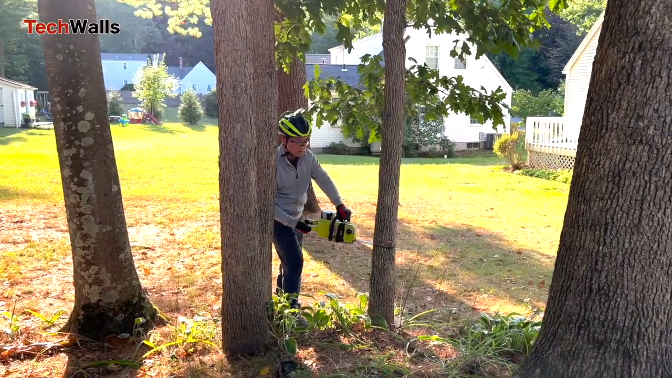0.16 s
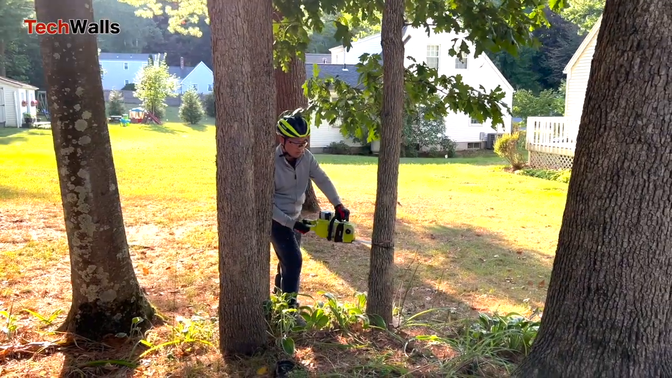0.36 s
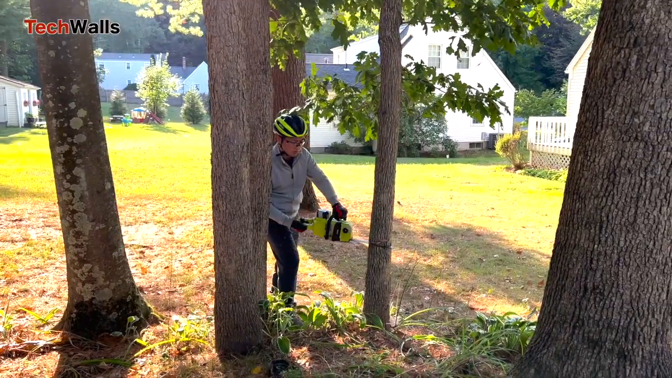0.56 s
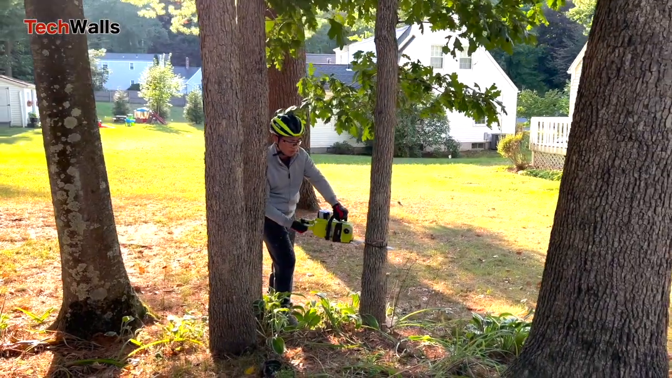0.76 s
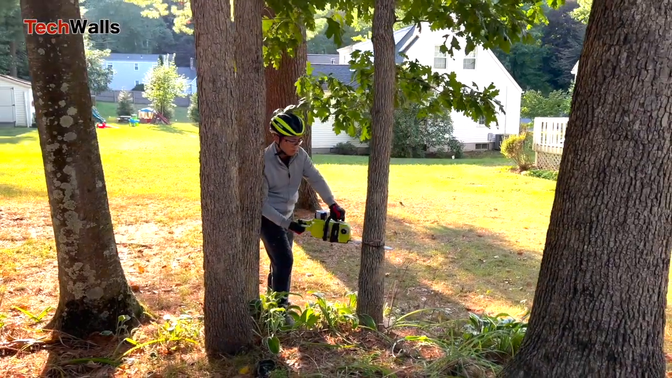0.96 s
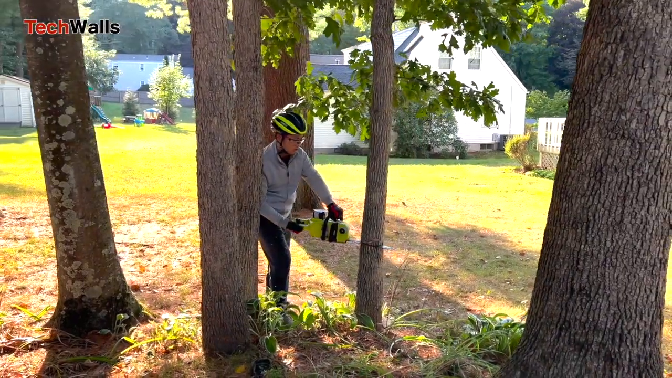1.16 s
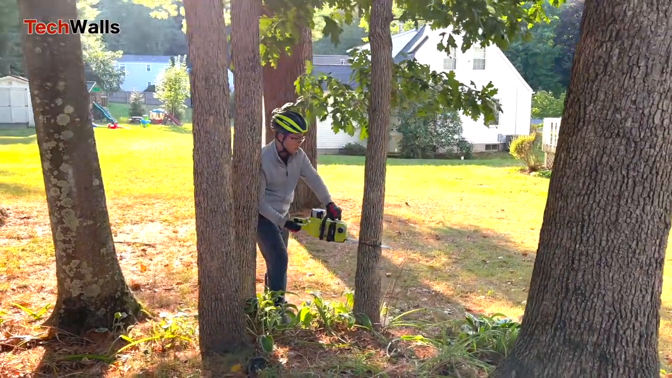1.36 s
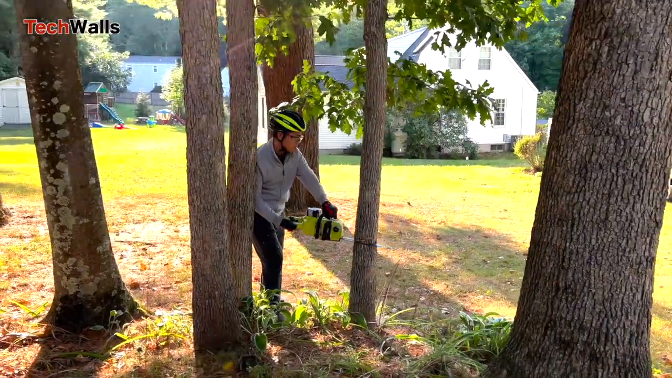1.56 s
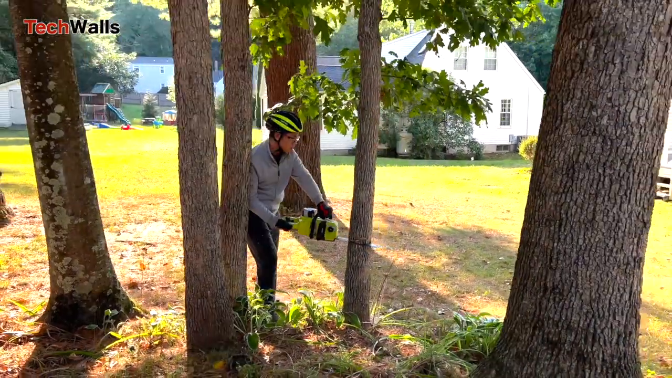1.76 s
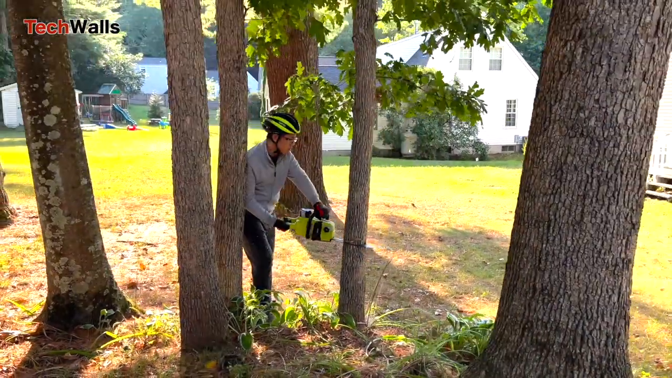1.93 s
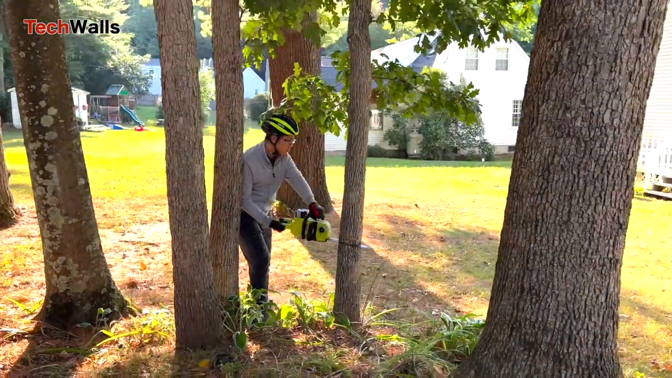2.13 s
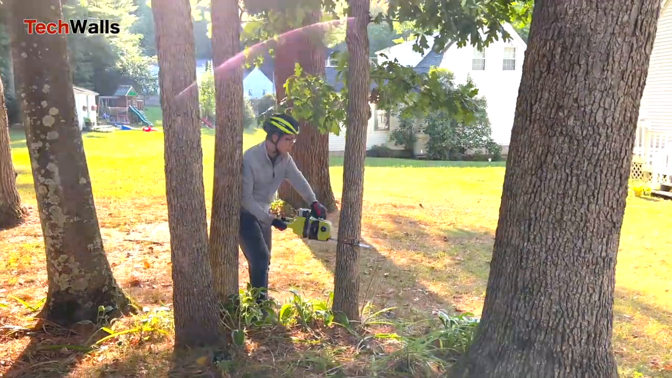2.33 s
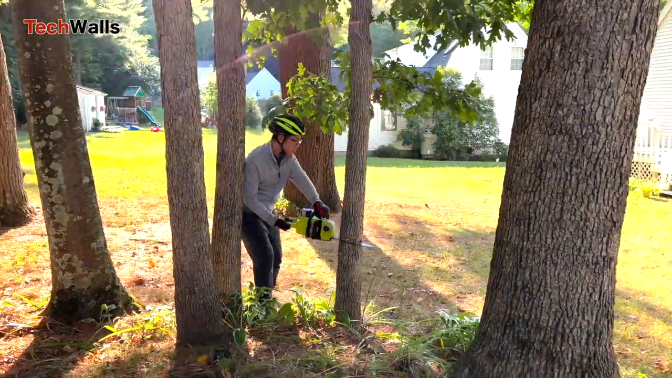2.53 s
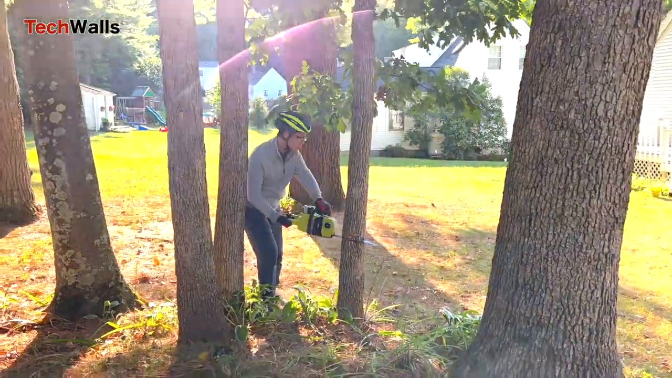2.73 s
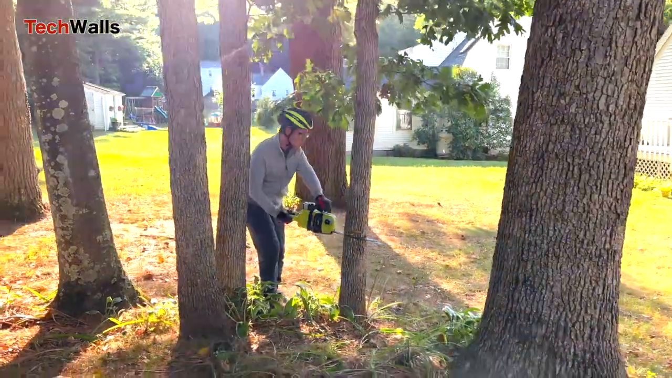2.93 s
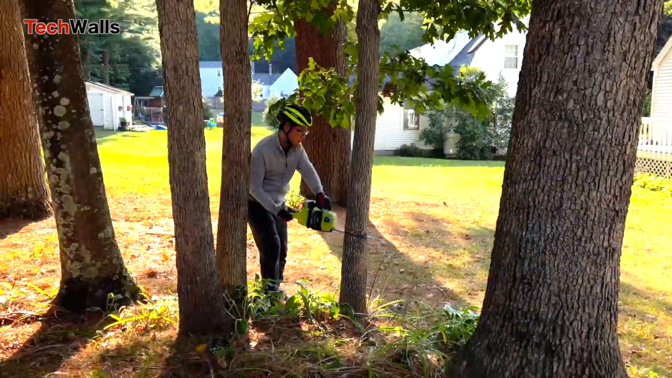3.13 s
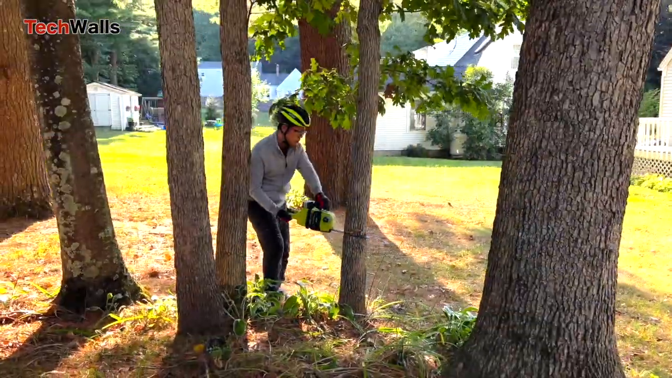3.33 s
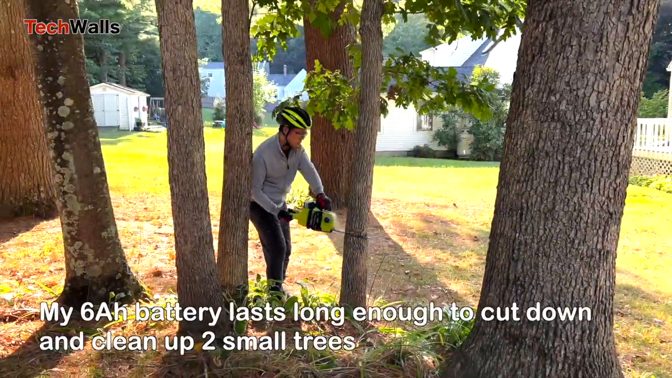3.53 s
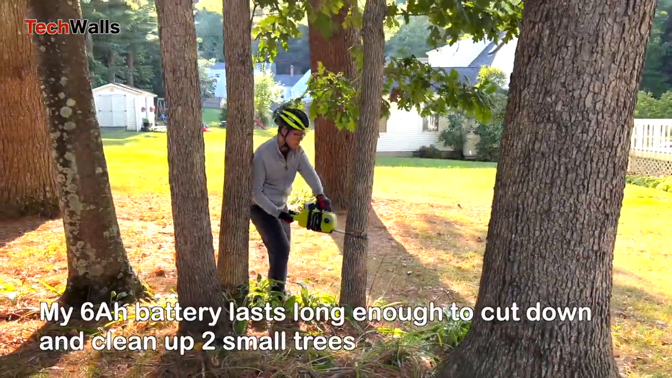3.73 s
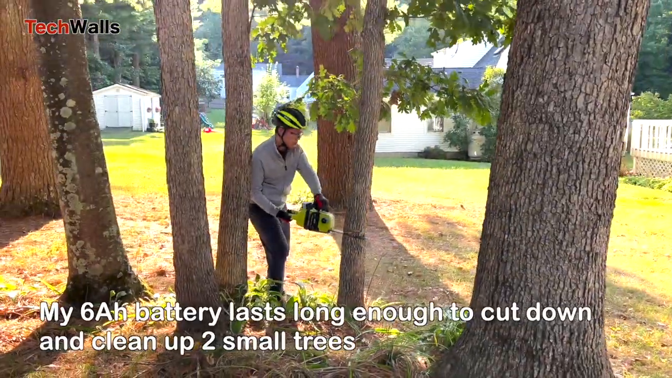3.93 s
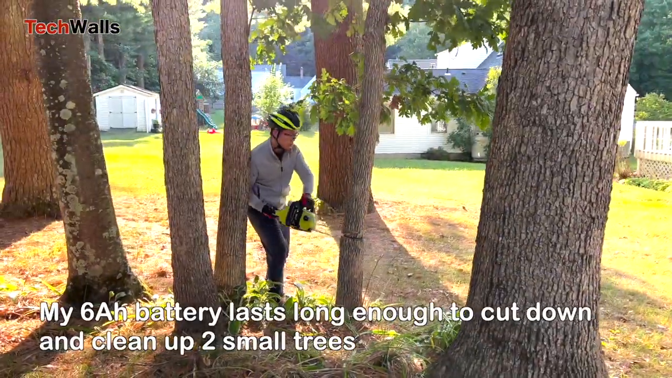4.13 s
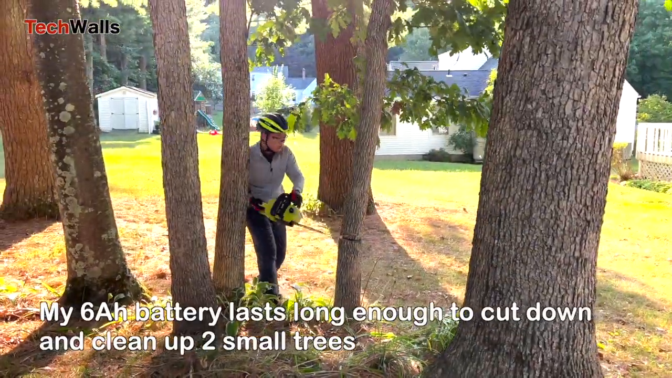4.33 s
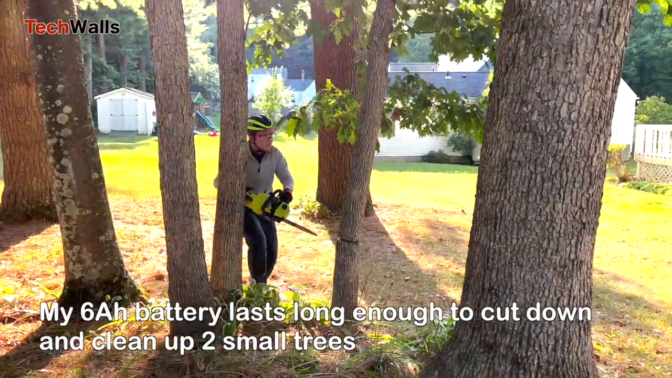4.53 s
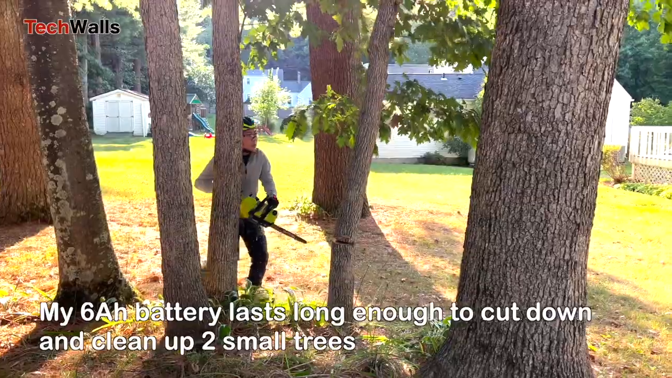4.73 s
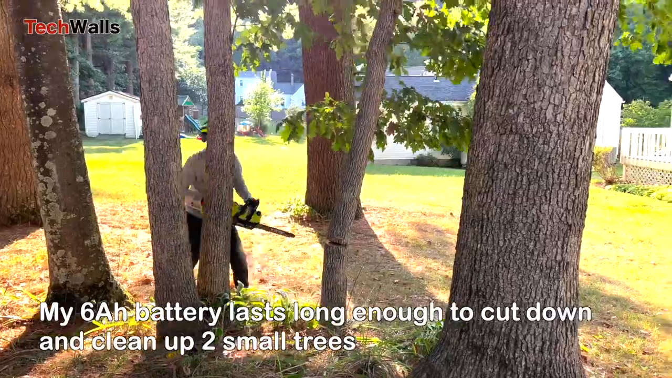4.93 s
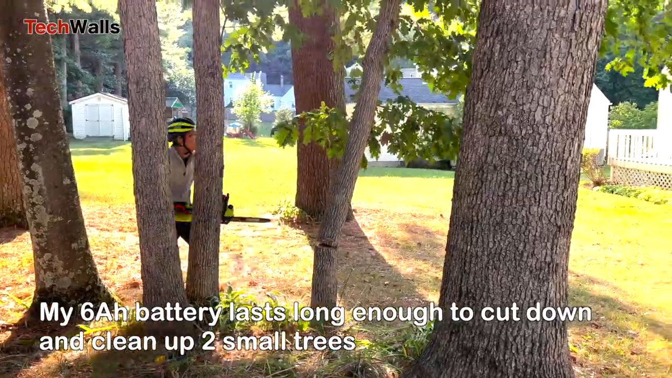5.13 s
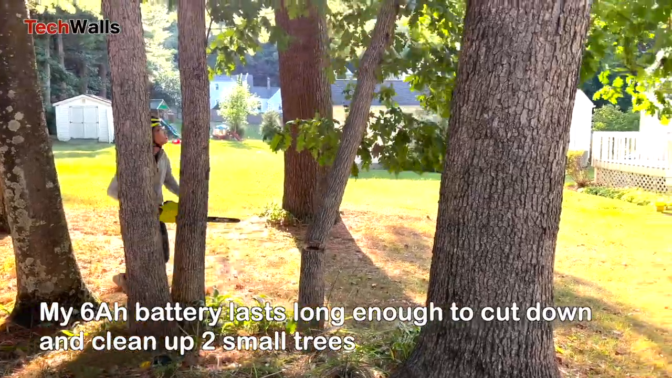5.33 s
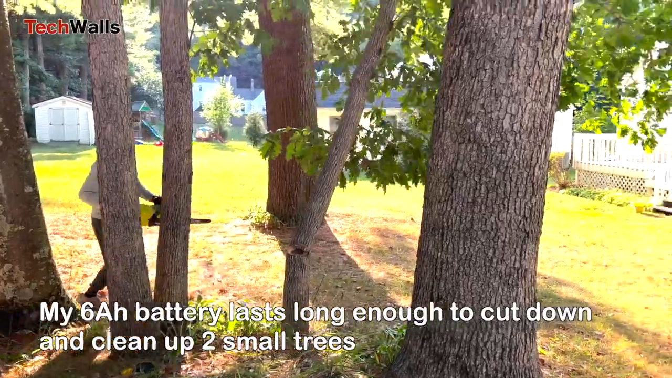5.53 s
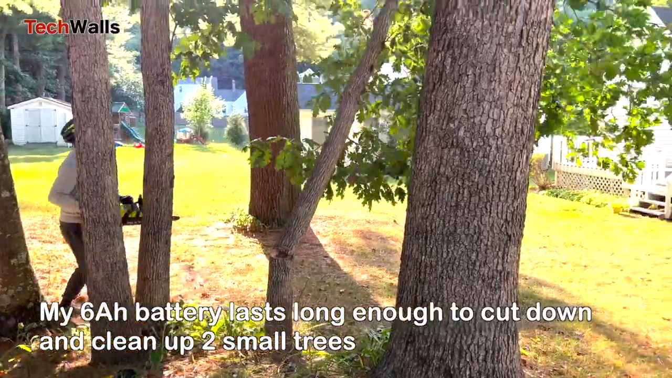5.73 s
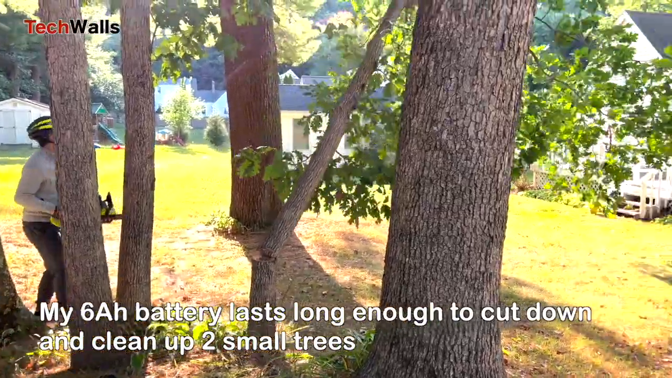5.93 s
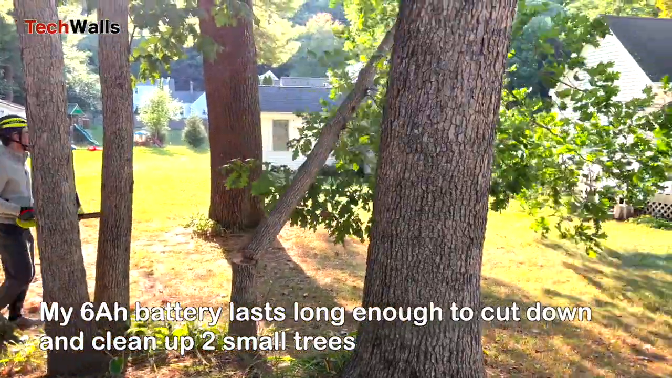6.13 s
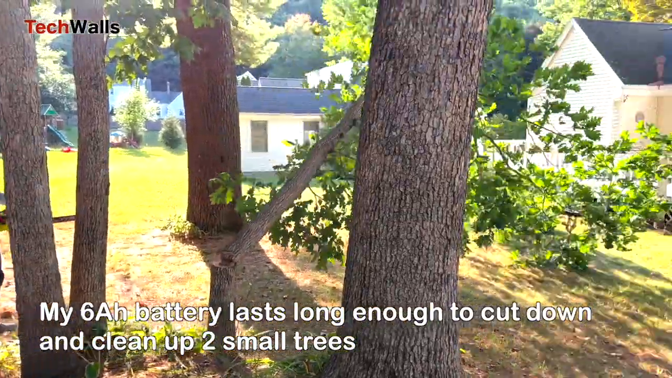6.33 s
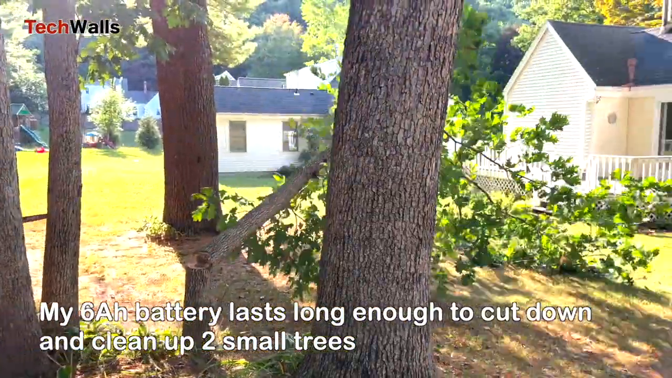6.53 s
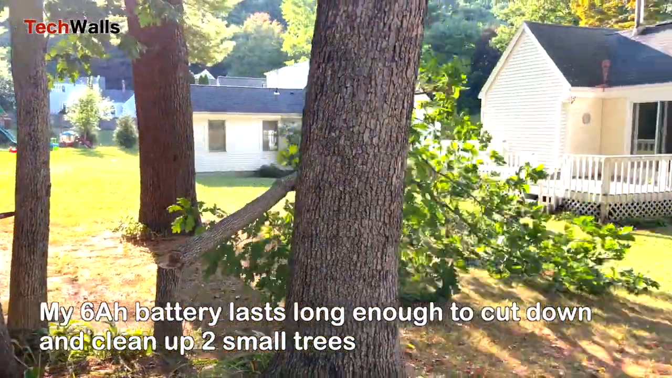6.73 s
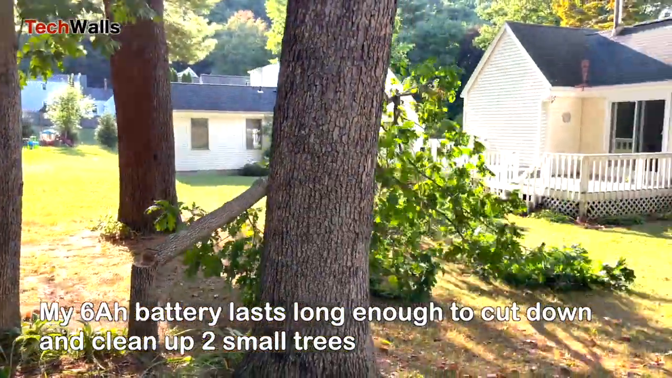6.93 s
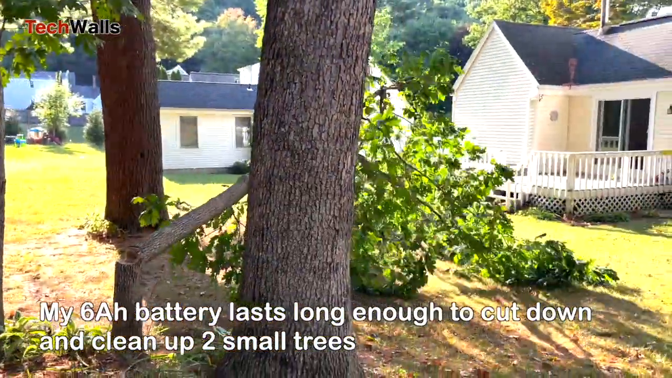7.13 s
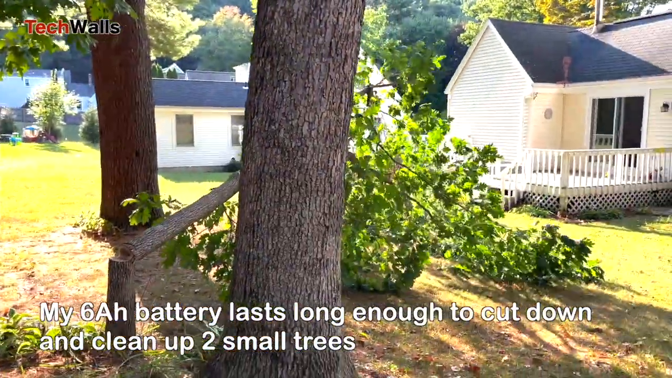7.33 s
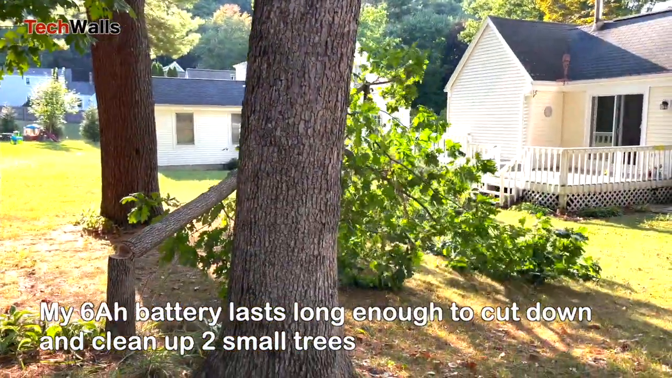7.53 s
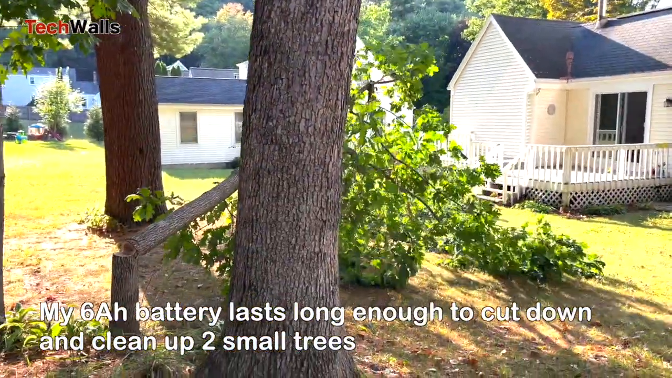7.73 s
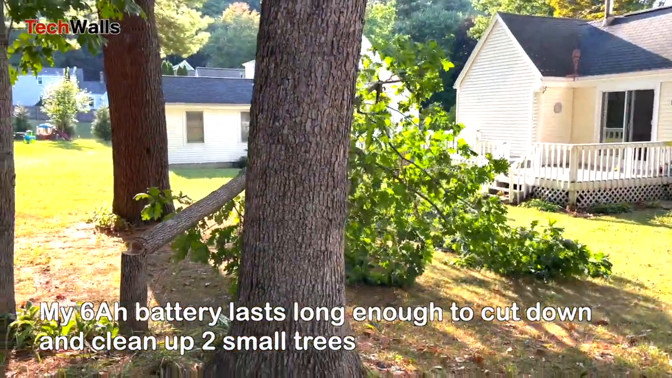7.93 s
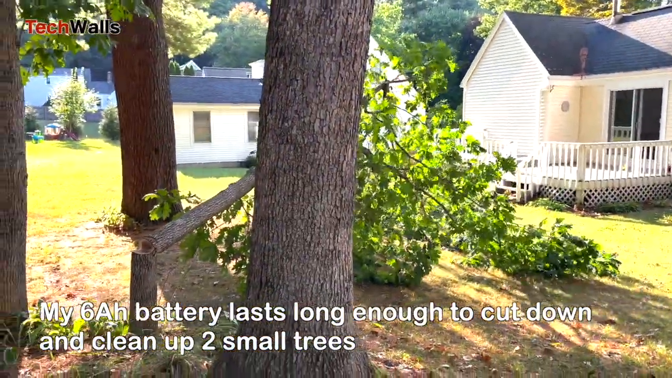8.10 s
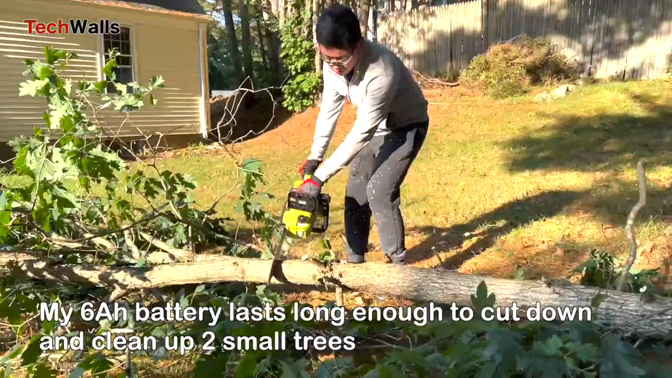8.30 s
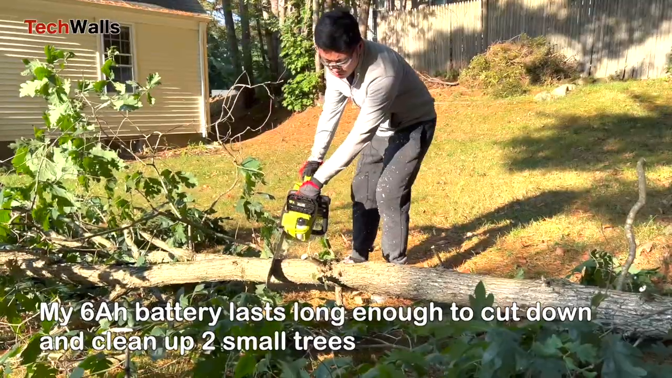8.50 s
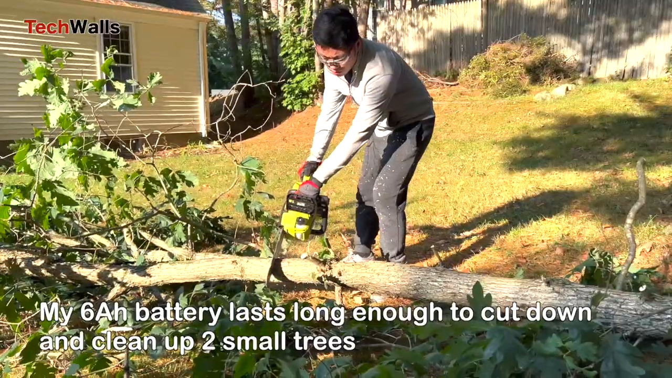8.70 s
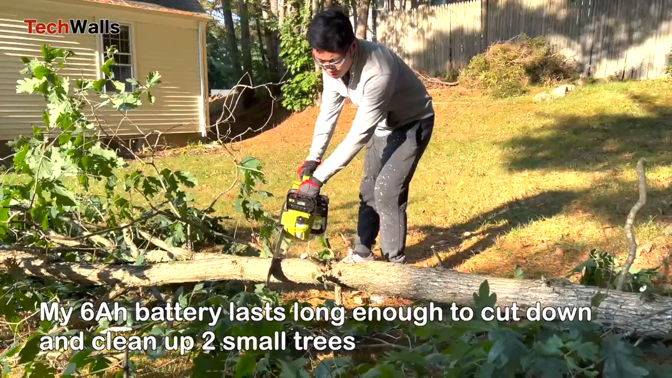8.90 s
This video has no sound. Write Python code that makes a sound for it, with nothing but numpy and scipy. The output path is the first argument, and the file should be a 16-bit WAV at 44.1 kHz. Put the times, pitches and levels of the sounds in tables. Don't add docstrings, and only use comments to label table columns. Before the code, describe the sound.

A battery chainsaw whines and rattles through a thin trunk, coasts down, then the tree cracks and falls with a leafy rush before sawing resumes.

```python
import sys
import numpy as np
from scipy import signal
from scipy.fft import rfft, irfft, next_fast_len
from scipy.io import wavfile
from scipy.ndimage import uniform_filter1d, map_coordinates

SR = 44100
rng = np.random.default_rng(int(sys.argv[2]) if len(sys.argv) > 2 else 0)


def digitize_waveform(pressure):
    field = np.atleast_2d(pressure).T
    bounded = np.clip(field, -1, 1)
    quanta = np.round(bounded * 32767).astype(np.int16)
    wavfile.write(sys.argv[1], SR, quanta)


def amplitude_ratio(level_db):
    exponent = np.asarray(level_db, float) / 20
    return 10 ** exponent


N = 395136
T = np.arange(N) / SR

# [f/Hz, level/dB]
TRAFFIC = [(15, -52), (25, -32), (43, -7.5), (65, 2), (82, -7), (115, -3.5), (179, -11.5), (208, -17),
           (469, -26), (504, -21), (599, -23), (786, -19.5), (1350, -27.5), (9000, -49), (11700, -77),
           (19800, -120)]
# [t/s, peak level/dB, f/Hz]
STEPS = [(7.797, -39, 1040), (7.896, -38, 1010), (7.911, -33.5, 2100), (7.921, -33, 1370),
         (7.93, -30, 1410), (7.944, -33, 1500), (7.957, -30, 1300), (7.978, -39, 999), (8.009, -39, 3200),
         (8.019, -29, 1050), (8.049, -40, 1130), (8.143, -48, 3030), (8.197, -41, 3800), (8.215, -41, 3500)]
RUSTLE_DB, CRUNCH_S = -15, 0.02

# [t/s, level/dB]
FALL = [
    (5.3, -92),
    (5.6, -55),
    (5.85, -52),
    (5.98, -58.5),
    (6.14, -51),
    (6.44, -43.5),
    (6.66, -43),
    (6.85, -47.5),
    (7.15, -55.5),
    (7.6, -70),
]
# [f/Hz, level/dB]
LEAVES = [(250, -21), (600, 5.5), (1200, 2.5), (2400, 1), (4000, 0.5), (6000, 0.5), (8000, -0.5),
          (12000, -7.5), (16000, -10)]
LAND_S, LAND_DB, RISE_DB_S, HOLD_S, DIE_DB_S, SWAY_DB = 6.49, -43.5, 56, 0.2, 34, -66
RUSTLE_AT_S, RUSTLE_PEAK_DB, RUSTLE_SLOPE_DB_S = 8.0, -59.5, 85

# [t/s, knock peak level/dB, tick peak #
# level/dB]
SNAPS = [(5.3141, -35.0, -39.0), (5.3631, -49.0, -38.0), (5.5532, -33.0, -34.0), (5.5745, -42.0, -29.0),
         (5.6066, -31.0, -34.0), (5.6333, -37, -36), (5.6406, -41, -35), (5.6849, -33.0, -22.0),
         (5.6917, -34.0, -37.0), (5.7049, -38.0, -35.0), (5.7133, -36.0, -28.0), (5.7874, -38.0, -36.0),
         (5.8273, -26.0, -24.0), (5.8535, -25.0, -30.0), (5.8596, -38.0, -36.0), (5.8874, -51.0, -39.0),
         (5.908, -36.0, -43.0), (5.9319, -37.0, -41.0), (5.9695, -50.0, -37.0), (5.9934, -47.0, -39.0),
         (6.0115, -39.0, -42.0), (6.0133, -45.0, -31.0), (6.0475, -32.0, -20.0), (6.062, -39.0, -33.0),
         (6.0719, -40.0, -27.0), (6.0902, -35.0, -32.0), (6.1091, -35.0, -37.0), (6.1186, -40.0, -33.0),
         (6.1224, -44.0, -36.0), (6.1258, -33.0, -28.0), (6.1367, -31.0, -35.0), (6.1707, -39.0, -22.0),
         (6.1739, -31.0, -35.0), (6.1815, -23.0, -34.0), (6.1926, -38.0, -30.0), (6.2259, -42.0, -30.0),
         (6.248, -39.0, -32.0), (6.2646, -30.0, -28.0), (6.2836, -41.0, -31.0), (6.3073, -45.0, -31.0),
         (6.3156, -36.0, -30.0), (6.3287, -22.0, -31.0), (6.3317, -16.0, -25.0), (6.3337, -17.0, -41.0),
         (6.3392, -27.0, -33.0), (6.3661, -36, -37), (6.3895, -22.0, -20.0), (6.4141, -40, -33),
         (6.4272, -20.0, -15.0), (6.4482, -29, -40), (6.4638, -32.0, -28.0), (6.4683, -29, -29),
         (6.5213, -16.0, -19.0), (6.5243, -17.0, -21.0), (6.5627, -36.0, -31.0), (6.6435, -36.0, -30.0),
         (6.649, -32.0, -30.0), (6.6761, -27, -36), (6.7178, -29, -32), (6.7203, -25, -26)]
# [f/Hz, t60/s]
YARD_DECAY = [(200, 0.31), (2000, 0.081), (12000, 0.41)]
KNOCK_HZ, KNOCK_S, TICK_HZ, TICK_S, SPLINTER_S = 2500, .0035, 12200, .0016, .014

# [t/s, unloaded shaft f/Hz, sprocket whine level/dB]
FELLING = [(0.0, 195.8, -30), (0.09, 192.3, -25.5), (0.25, 193.8, -28), (0.46, 192.9, -33),
           (0.7, 193.8, -32.5), (0.8, 193.1, -26.5), (1.22, 192.4, -27), (1.45, 193.2, -23),
           (1.9, 193.6, -25), (2.07, 191.1, -28), (2.2, 189, -26.5), (2.37, 189, -24.5), (2.55, 189.6, -20),
           (2.83, 188.7, -22), (3.02, 188.2, -20.5), (3.5, 188.3, -23), (3.81, 190.8, -21.5),
           (3.96, 187.2, -22.5)]
# [t/s, shaft f/Hz, sprocket whine level/dB]
BUCKING = [(8.239, 177.2, -36), (8.29, 174.6, -35), (8.33, 172.7, -35), (8.4, 167.1, -33.5),
           (8.445, 164, -40), (8.5, 169.9, -34), (8.54, 175.5, -32), (8.586, 180.2, -31.5),
           (8.66, 181.3, -27.5), (8.74, 181.2, -28.5), (8.8, 176.7, -36), (8.84, 173.8, -38),
           (8.875, 171, -40), (8.96, 174.7, -35)]
# [t/s, sag/%, onset/s, recovery/s, knock level/dB]
BITES = [(0.35, 1.86, 0.056, 0.11, 2), (0.78, 3.72, 0.055, 0.097, 7.5), (1.22, 4.07, .1, .12, 8),
         (1.58, 1.38, 0.078, 0.068, 4.5), (1.97, 3.1, 0.083, 0.066, 6), (2.191, 2.48, 0.065, 0.0393, 5.5),
         (2.4, 8, 0.069, 0.16, 9.5), (2.719, 4.43, .12, .12, 3.5), (2.9, 1.595, 0.03985, 0.049, 3.5),
         (3.14, 1.97, 0.048, 0.11, 5), (3.29, 2.65, 0.047, 0.09, 1), (3.59, 2.18, 0.078, 0.11, 2)]
RELEASE_S, STOP_S = 3.967, 6.1
QUICK_SHARE, QUICK_S, COAST_S = .113, .1, .91
DRAG = .04
# [t/s, level/dB]
LIFTED = [(3.96, -0.5), (4.03, 1), (4.14, 0), (4.24, 1), (4.32, 1.5), (4.45, 3.5), (4.6, 5.5), (4.75, 4.5),
          (4.9, 4.5), (5.0, 2), (5.1, 3), (5.22, 4.5), (5.36, 1), (5.45, 2), (5.6, 3.5), (5.78, 1),
          (5.88, 0), (6.02, -18)]
# [f/Hz, level/dB]
COASTING = [(230, -42.5), (326, -34), (365, -21.5), (480, -17), (650, -0.5), (780, -12), (836, -21.5),
            (890, -12), (1120, 2.5)]

# [multiple of shaft speed, level at full speed/dB, dB per % sag, share of whine's swell]
FELLING_LINES = [
    (3.004, -31.5, -0.63, 0.054),
    (20.9, -59, -1, .05),
    (14.4, -71.5, 3.5, 0.05),
]
BUCKING_LINES = [
    (3, -44, 0.13, 0.05),
    (14, -50.5, 2.2, 0.05),
    (5, -50, .1, .05),
]
# [multiple of shaft speed, level over the leader/dB]
FELLING_ORDERS = [
    [(4, -5.5), (5, -8.5), (8, -7.5)],
    [],
    [(1, -22.5), (2, -10)],
]
BUCKING_ORDERS = [
    [(2, -1.5), (4, 4), (8, -7), (9, -3.5), (12, -3.5), (18, -8)],
    [],
    [(22, -21)],
]
# [level at full speed/dB, dB per octave of speed, share of lift, of bite's knock, of whine's swell]
FELLING_NOISE = [
    (-34, 9.5, 1.66, 0.47, 0.026),
    (-30.5, 11, 0.63, 0.078, 0.042),
    (-53.5, 1.6, 1.3, 0.87, 0.031),
]
BUCKING_NOISE = [
    (-37, -18, 0, 0, 0.041),
    (-30.5, 0, 0, 0, 0.045),
    (-54, -21, 0, 0, .05),
]
# [f/Hz, level/dB]
RATTLE = [(200, -48), (400, -4), (620, 2), (1050, 2), (1600, -4), (2200, -9), (2900, -10.5), (4000, -17.5)]
HISS = [(1200, -42), (2200, -0.5), (3000, 1), (4500, -0.5), (5600, 0), (7000, 3.5), (9000, 4), (12000, 3),
        (16000, 4.5)]
# [f/Hz, width/Hz, level over valleys/dB]
FAR_BANDS = [(566, 140, 8.5), (762, 120, 14), (1102, 285, 11.5), (1644, 300, 12), (2097, 320, 9.5),
             (2625, 100, 4.5), (3025, 91, 5), (3500, 220, 5.5), (4016, 340, 11), (4454, 97, 11.5),
             (4960, 530, 6), (5700, 130, -10)]
NEAR_BANDS = [(726, 330, 8.5), (1170, 140, 3.9), (1500, 130, 10.7), (2030, 270, 12), (2560, 220, 8.9),
              (3100, 120, 6.6), (3630, 220, 15.4), (4020, 230, 16), (4630, 180, 16), (5150, 240, 12.7),
              (5940, 330, 9.6), (6460, 350, 9), (6900, 270, 2.5)]
DEEP_BANDS = [(656, 172, 15.8), (1095, 260, 12.4), (1590, 210, 14.4), (2100, 720, 6), (2630, 150, 8.2),
              (3080, 120, 9.8), (3500, 300, 5.1), (4011, 400, 9.5), (4640, 160, 8.8), (4958, 467, 5.5)]
FREE_BANDS = [(641, 126, 17.5), (1050, 190, 15.5), (1562, 180, 18), (2080, 305, 11.4), (2576, 152, 10.1),
              (3000, 188, 11.5), (3500, 385, 14.9)]
SHALLOW_BANDS = [(1615, 300, 8), (2110, 360, 8), (2690, 150, -1), (3080, 150, 1), (3380, 260, 2.5),
                 (3750, 220, 7), (4150, 200, 8), (4550, 270, 8.5), (4990, 280, 6.5), (6670, 250, -2),
                 (6900, 150, -8.5)]
# [f/Hz, level/dB]
FAR_SCATTER = [(200, -65), (700, 1.5), (1800, 6), (2700, -4.5), (4500, -1), (6100, 0.5), (7300, -9.5),
               (9000, -5), (12000, -8.5)]
NEAR_SCATTER = [(200, -17), (700, -19), (1500, 2), (2450, -3), (3500, 4), (5000, 9), (7300, 0), (9000, -3),
                (12000, -5)]
# [t/s, hiss level/dB, levels of orders 9, 12, 18, 24/dB]
FACING = [(0.0, 2.5, -44.0, -46, -39.5, -62), (0.3, 1.5, -43.0, -43.5, -45, -44),
          (0.55, 2.5, -58.5, -43.5, -41, -53), (0.8, 0.5, -36.0, -49.0, -62, -50),
          (1.05, 1.5, -37.5, -48.0, -61, -56), (1.3, 1, -36.5, -44, -46, -44.0),
          (1.55, 0.5, -41.5, -54.0, -45, -54), (1.8, 1, -45.0, -50.5, -45, -52.0),
          (2.05, 0.5, -41.5, -43.5, -51, -51), (2.3, 1.5, -38.5, -48, -70, -45),
          (2.55, 1.5, -41.5, -40.5, -53, -43), (2.8, 2.5, -41.0, -40.5, -48, -48),
          (3.05, 1.0, -39.0, -37.5, -42.5, -45), (3.3, 2.5, -40.0, -37, -46.0, -37),
          (3.55, 0.5, -39.5, -45.5, -47, -54), (3.96, 1, -42.0, -39, -46, -50)]
FACING_ORDERS = 9, 12, 18, 24
DEEP_S, DEEP_SPAN_S, DEEP_DB, DEEP_ORDERS = 2.27, 0.21, -1.5, 5.5
DEEP_TURN_DB = .4
SHALLOW_S, SHALLOW_SPAN_S = 1.34, 0.35
SWEEP = 0.97
LINK_DB, LINK_TILT_DB, LINK_SHARP = 15, -6, .85
LINK_EXTRA_DB = [-2, 2, 3.5, 4, 2, 0]

# [f/Hz, left leads/rad]
PORTS = [(0, 0), (780, .55), (1000, .25), (1800, .35), (2050, -.4), (2500, .2), (3600, .6), (5000, .7),
         (5900, -.6), (7300, 0), (9000, -2.5), (10800, -3.6), (12800, -5.9), (14200, -6.6), (15800, -9)]
# [f/Hz, level/dB]
MIC = [(30, -3.5), (8000, 3), (9500, 0.5), (10800, 1.5), (12000, 9), (13200, 9.5), (15500, 3.5)]
# [f/Hz, level/dB]
BALANCE_DB = [(150, -.5), (600, 0.8), (950, 1.8), (1150, 2.5), (1700, 4), (2700, -.3), (4400, -2.5),
              (8000, .6)]
LOST_MID, LOST_SIDE, TOP_HZ, EDGE_HZ = (9100, 10700), (12850, 14200), 15800, 16600
# [start t/s, end t/s, low f/Hz, high f/Hz, gain]
SPARED = [(2.41, 2.45, 9100, 10700, .5), (2.45, 2.465, 9100, 9700, .5), (4.545, 4.58, 9100, 9700, .5),
          (7.77, 8.1, 9100, 9700, 1), (7.9, 7.965, 9700, 10400, 1), (8.01, 8.07, 9700, 10400, 1),
          (4.7, 5.6, 10700, 11000, -1), (6.9, 8.2, 10700, 11150, -1)]


def unit(x):
    return x / np.sqrt(np.mean(x ** 2) + 1e-20)


def along(points, hz):
    f, v = np.transpose(points)
    return np.interp(np.log(hz + 1), np.log(f + 1), v)


def curves(rows):
    s, *cols = np.transpose(rows)
    return [np.interp(T, s, c) for c in cols]


def wobble(rate):
    knots = rng.standard_normal(int(N * rate / SR) + 4)
    coarse = T[::8]
    return np.interp(T, coarse, map_coordinates(knots, [coarse * rate]))


def between(start, end):
    is_open = (T >= start - .005) & (T <= end + .01)
    return uniform_filter1d(1. * is_open, size=30, mode="nearest")


def sigmoid(start, span):
    return 1 / (1 + np.exp((start - T) / span))


def filtered(x, response):
    m = next_fast_len(N + 8192)
    return irfft(rfft(x, m) * response(np.fft.rfftfreq(m, 1 / SR)), m)[..., :N]


def ground(echo_s, echo_db, dull_hz):
    def response(f):
        delay = np.exp(-2j * np.pi * f * echo_s)
        return 1 + amplitude_ratio(echo_db) * delay / np.sqrt(1 + (f / dull_hz) ** 2)
    return response


def bar(modes):
    def response(f):
        peaks = [amplitude_ratio(2 * db) / (1 + (2 * (f - hz) / width) ** 2) ** 2 for hz, width, db in modes]
        return np.sqrt(1 + sum(peaks))
    return response


def rush(spectrum, diffuse, bounce, patchy_db, grain=1):
    z = signal.stft(rng.standard_normal((2, N)) * grain, nperseg=512)[2]
    field = uniform_filter1d(rng.standard_normal(z.shape[1:]), size=5, axis=0)
    field = uniform_filter1d(field, size=10, axis=1)
    pair = signal.istft(z * amplitude_ratio(patchy_db * unit(field)), nperseg=512)[1][:, :N]
    mid = filtered(pair[0], lambda f: amplitude_ratio(along(spectrum, f)) * bounce(f))
    side = filtered(pair[1], lambda f: amplitude_ratio(along(spectrum, f) + along(diffuse, f)))
    return unit(np.array([mid + side, mid - side]))


def background():
    far = rush(TRAFFIC, [(60, -19), (300, -13), (800, 0.0), (8000, 5.5)], bar([]), patchy_db=1.0)
    song = [(6400, -58), (6850, -10), (7050, -19), (7250, -14), (7700, -60)]
    insect = rush(song, [(7000, 2.4)], bar([]), patchy_db=-2.0)
    return amplitude_ratio(-47.0) * far + amplitude_ratio(-68.5) * insect


def steps():
    out, t = np.zeros((2, N + SR)), np.arange(SR // 8) / SR
    bright = signal.butter(2, [1800, 6000], "band", fs=SR)
    for s, db, hz in STEPS:
        crunch = rng.standard_normal(len(t)) + 0.97 * rng.standard_normal((2, len(t)))
        fall_db = -20 * t / CRUNCH_S
        knock = unit(signal.lfilter(*signal.iirpeak(hz, 3.2, SR), crunch)) * amplitude_ratio(fall_db)
        rustle = amplitude_ratio(RUSTLE_DB) * unit(signal.lfilter(*bright, crunch)) * amplitude_ratio(0.32 * fall_db)
        onset = 1 - np.exp(-t / 0.00068)
        out[:, round(s * SR):][:, :len(t)] += amplitude_ratio(db - 9.5) * (knock + rustle) * onset
    return out[:, :N]


def crown():
    late_rustle_db = RUSTLE_PEAK_DB - RUSTLE_SLOPE_DB_S * np.abs(T - RUSTLE_AT_S)
    leaves_db = np.maximum(curves(FALL)[0], late_rustle_db)
    rise_db = RISE_DB_S * np.maximum(LAND_S - T, 0)
    die_db = DIE_DB_S * np.maximum(T - LAND_S - HOLD_S, 0)
    thud_db = np.maximum(SWAY_DB, LAND_DB - rise_db - die_db)
    clumps_db = 0.7 * wobble(40)
    flicks_db = 3.8 * np.maximum(wobble(900) - 1.1, 0)
    grain = amplitude_ratio(2.1 * wobble(300) + clumps_db + flicks_db)
    bands = bar([(1150, 200, 3), (1700, 200, 4), (2300, 220, 7), (2750, 200, 6), (3250, 200, 5),
                 (3700, 200, 3)])
    scatter = [(300, -12), (1500, -3), (6000, 1), (12000, -6)]
    leaves = rush(LEAVES, scatter, bands, patchy_db=.8, grain=grain)
    tumble_db = 1.5 * wobble(25)
    low = [(60, -10), (130, -2.5), (250, -8.0), (450, -12.0), (900, -27.0)]
    thud = rush(low, [(200, -18.0)], bar([]), patchy_db=4.0)
    falling = between(FALL[0][0], BUCKING[0][0])
    return falling * (amplitude_ratio(leaves_db + 3.0) * leaves + amplitude_ratio(thud_db + tumble_db) * thud)


def yard(x):
    hz, _, z = signal.stft(rng.standard_normal((2, SR // 2)), SR, nperseg=256)
    t = _
    tail = signal.istft(z * amplitude_ratio(-60 * t / along(YARD_DECAY, hz)[:, None]), SR, nperseg=256)[1]
    return signal.fftconvolve(x[None], tail / np.linalg.norm(tail[0]), axes=1)[:, :N]


def snaps():
    out, t = np.zeros((2, N + SR)), np.arange(SR // 25) / SR
    b, a = signal.iirpeak(2500, 1.3, SR)

    def peak(v):
        return v / np.abs(v).max()

    def ring(hz, t60):
        return np.sin(2 * np.pi * hz * t) * amplitude_ratio(-60 * t / t60) * (1 - np.exp(-t / .0002))

    for s, knock_db, tick_db in SNAPS:
        pan_db, *detune = rng.standard_normal(4) * [1.5, .15, .25, .03]
        noise = rng.standard_normal((2, len(t)))
        wood = ring(KNOCK_HZ * np.exp(detune[0]), KNOCK_S)
        wood = wood + .6 * ring(2 * KNOCK_HZ * np.exp(detune[1]), KNOCK_S)
        knock = peak(wood + .3 * noise[0] * amplitude_ratio(-60 * t / TICK_S))
        splinters = peak(signal.lfilter(b, a, noise[1]) * amplitude_ratio(-60 * t / SPLINTER_S))
        knock = knock + .3 * splinters
        tick = ring(TICK_HZ * np.exp(detune[2]), TICK_S)
        tick = peak(tick + 1.3 * ring(1.22 * TICK_HZ, TICK_S) + .35 * ring(.7 * TICK_HZ, TICK_S))
        snap = amplitude_ratio(knock_db - .5) * knock + amplitude_ratio(tick_db - 3.5) * tick
        out[:, round(s * SR) - 4:][:, :len(t)] += amplitude_ratio(np.array([[.5], [-.5]]) * pan_db) * snap
    dry = filtered(out[:, :N], lambda f: ground(.0022, -5, 5000)(f) * f / (f + 600))
    return dry + amplitude_ratio(-4.5) * yard(dry.mean(0))


def felling_hand():
    free_hz, whine_db = curves(FELLING)
    shapes = []
    for s, _, onset, recovery, _ in BITES:
        before, after = ((s - T) / onset) ** 2, (np.abs(T - s) / recovery) ** 1.4
        shapes.append(np.exp(-np.where(T < s, before, after)))
    sag, knock_db = np.array(BITES)[:, [1, 4]].T @ np.array(shapes)
    knock_db = np.interp(T + 0.007, T, knock_db)
    after = np.maximum(T - RELEASE_S, 0)
    run_down = np.exp(-after / COAST_S) * (1 - DRAG * after ** 2).clip(.3)
    coast = QUICK_SHARE * np.exp(-after / QUICK_S) + (1 - QUICK_SHARE) * run_down
    shaft_hz = free_hz * (1 - sag / 100) * coast
    radiate_db = (after > 0) * along(COASTING, 6 * shaft_hz)
    deep = sigmoid(DEEP_S, DEEP_SPAN_S)
    running = between(0, STOP_S)
    return shaft_hz, whine_db, radiate_db, curves(LIFTED)[0], knock_db, running, deep, curves(FACING)


def bucking_hand():
    return *curves(BUCKING), 0, 0, 0, between(BUCKING[0][0], N / SR), 0, [0]


def shaft_tones(hand, lines, orders, rattle_db, turn, loose, bounce, rough_db, strain):
    shaft_hz, whine_db, radiate_db, _, _, running, deep, facing = hand
    speed, swell_db = shaft_hz / shaft_hz.max(), whine_db - whine_db.mean()
    fade_db = 22 * np.log2(speed)
    unloaded_db = -30 * loose
    sag = np.minimum(100 * (1 - speed), strain)
    grid = np.arange(0, 5000, 10.)
    free_db = 20 * np.log10(bar(FREE_BANDS)(grid) / bar(FREE_BANDS)(grid).max())

    def colour(k):
        band_db = 20 * np.log10(bounce(grid) / bounce(k * .97 * shaft_hz.max()))
        return np.interp(k * shaft_hz, grid, band_db)

    line_db = [db + per * sag + share * swell_db + fade_db for _, db, per, share in lines]
    weak = [(row[0], db) for row, db in zip(lines, line_db)]
    leaders_db = line_db[:2] + [rattle_db + 0.47 * fade_db]
    for lead_db, group in zip(leaders_db, orders):
        weak += [(k, lead_db + db + 1.8 * wobble(3.3)) for k, db in group]

    levels = [(6, whine_db + radiate_db)]
    for k, db in weak:
        damped_db = db + DEEP_DB * deep * (k <= DEEP_ORDERS)
        levels.append((k, damped_db + SWEEP * loose * colour(k)))
    levels[2:4] = [(k, db + unloaded_db) for k, db in levels[2:4]]
    levels += [(k, db + 0.5 + fade_db + unloaded_db) for k, db in zip(FACING_ORDERS, facing[1:])]
    links_db = rattle_db + 20 * np.log10(loose) + LINK_DB
    for m in range(2, 8):
        band_db = LINK_SHARP * np.interp(6 * m * shaft_hz, grid, free_db)
        levels.append((6 * m, links_db + LINK_TILT_DB * m + LINK_EXTRA_DB[m - 2] + band_db))

    on, tones = running > 0, np.zeros(N)
    for k, db in levels:
        loudness = amplitude_ratio((db + 3.0 + rough_db * wobble(22))[on])
        tones[on] += loudness * np.sin((k * turn + 0.13 * wobble(60))[on])
    return tones


def housing_drone(drone_db, speed):
    loaded = np.clip(4 * speed - 2.6, 0, 1)
    free_note = [(250, -30), (305, -19), (335, -15.5), (370, -13.0), (470, -38.5)]
    free = rush(free_note, [(300, -12)], bar([]), patchy_db=1.0)
    wide_note = [(170, -22), (240, -2.5), (300, -4.0), (390, -8.0), (520, -43)]
    wide = rush(wide_note, [(300, -17)], bar([]), patchy_db=2.5)
    return amplitude_ratio(drone_db + 3.5) * (loaded * wide + (1 - loaded) * amplitude_ratio(-0.5) * free)


def chain_rattle(rattle_db, deep, loose, bounce, diffuse):
    shallow_cut = np.sqrt(1 - deep) * rush(RATTLE, diffuse, bounce, patchy_db=1.0)
    deep_cut = np.sqrt(deep) * amplitude_ratio(-0.6) * rush(RATTLE, diffuse, bar(DEEP_BANDS), patchy_db=1.0)
    free = amplitude_ratio(1.5) * rush(RATTLE, [(300, -2), (2500, 2)], bar(FREE_BANDS), patchy_db=2.0)
    mix = np.sqrt(1 - loose) * (shallow_cut + deep_cut) + np.sqrt(loose) * free
    return amplitude_ratio(rattle_db + 6.0 + 0.59 * wobble(20)) * mix


def cutting_hiss(hiss_db, turn, bounce, diffuse, bright_db):
    links = 1 + 0.31 * np.sin(6 * turn) + 0.076 * np.sin(2 * turn)
    sunk = sigmoid(SHALLOW_S, SHALLOW_SPAN_S)

    def fizz(bands):
        def shine(f):
            return bands(f) * amplitude_ratio(bright_db / (1 + (10000 / (f + 1)) ** 8))
        return rush(HISS, diffuse, shine, patchy_db=1.1, grain=links)

    mix = np.sqrt(sunk) * fizz(bounce) + np.sqrt(1 - sunk) * fizz(bar(SHALLOW_BANDS))
    return amplitude_ratio(hiss_db + 4.0 + 0.16 * wobble(22)) * mix


def saw(hand, lines, noise, orders, bounce, diffuse, rough_db, pan_db, bright_db, strain):
    shaft_hz, whine_db, _, lift_db, knock_db, running, deep, facing = hand
    speed, swell_db = shaft_hz / shaft_hz.max(), whine_db - whine_db.mean()
    noise_db = []
    for db, slope, lift, knock, swell in noise:
        moved_db = lift * lift_db + knock * knock_db + swell * swell_db
        noise_db.append(db + slope * np.log2(speed) + moved_db)
    rattle_db, hiss_db, drone_db = noise_db
    turn = 2 * np.pi * np.cumsum(shaft_hz * (1 + 0.002 * wobble(30))) / SR
    loose = np.clip(10 * (.88 - speed), 1e-4, 1)
    tones = shaft_tones(hand, lines, orders, rattle_db, turn, loose, bounce, rough_db, strain)
    drone = housing_drone(drone_db, speed)
    rattle = chain_rattle(rattle_db, deep, loose, bounce, diffuse)
    hiss = cutting_hiss(hiss_db + 0.73 * facing[0], turn, bounce, diffuse, bright_db)
    pan = amplitude_ratio(np.outer([1, -1], pan_db - DEEP_TURN_DB * deep))
    return running * ((tones + rattle + drone) * pan + hiss)


def scene():
    felling = saw(felling_hand(), FELLING_LINES, FELLING_NOISE, FELLING_ORDERS, bar(FAR_BANDS), FAR_SCATTER,
                  rough_db=1.3, pan_db=0.37, bright_db=-0.5, strain=10.4)
    bucking = saw(bucking_hand(), BUCKING_LINES, BUCKING_NOISE, BUCKING_ORDERS, bar(NEAR_BANDS), NEAR_SCATTER,
                  rough_db=3.0, pan_db=0.0, bright_db=8.5, strain=9.9)
    return background() + steps() + crown() + snaps() + felling + bucking


def low_pass(x):
    return signal.sosfilt(signal.butter(12, 16670, fs=SR, output="sos"), x)


def record(dry):
    def ports(f):
        lead = np.interp(f, *np.transpose(PORTS)) / 2
        phase = np.exp(1j * np.outer([1, -1], lead))
        balance = amplitude_ratio(np.outer([.5, -.5], along(BALANCE_DB, f)))
        return (f < EDGE_HZ) * amplitude_ratio(along(MIC, f)) * phase * balance

    def kept(band, f):
        return ((f < band[0]) | (f > band[1])) * (f < TOP_HZ)

    left, right = filtered(dry, ports)
    whole = np.array([left + right, left - right]) / 2
    thin = filtered(whole, lambda f: np.array([kept(LOST_MID, f), kept(LOST_SIDE, f)]))
    power = filtered(thin[0], lambda f: f > 4000) ** 2
    click = uniform_filter1d(power, size=60) > 7 * uniform_filter1d(power, size=2500)
    opened = np.clip(8 * uniform_filter1d(1. * click, size=500), 0, 1)
    mid, side = thin + amplitude_ratio(7) * opened * (whole - thin)
    for start, end, low, high, gain in SPARED:
        band = filtered(whole[0], lambda f: (f >= low) & (f <= high))
        mid = mid + gain * (1 - opened) * between(start, end) * band
    return low_pass(np.array([mid + side, mid - side]))


dry = scene()
out = record(dry)
digitize_waveform(out)
```